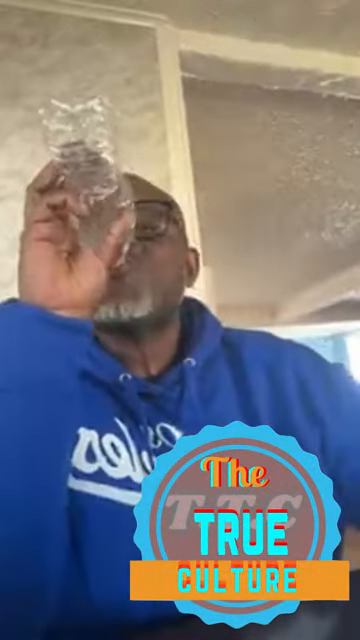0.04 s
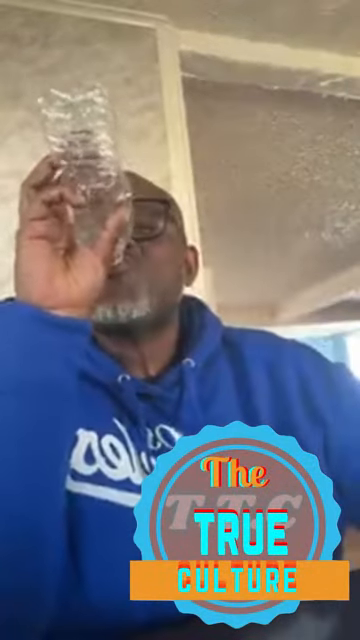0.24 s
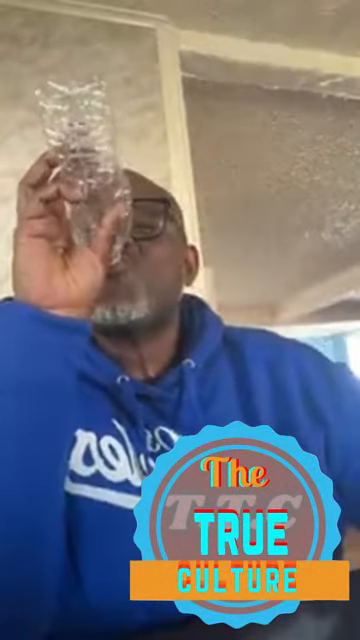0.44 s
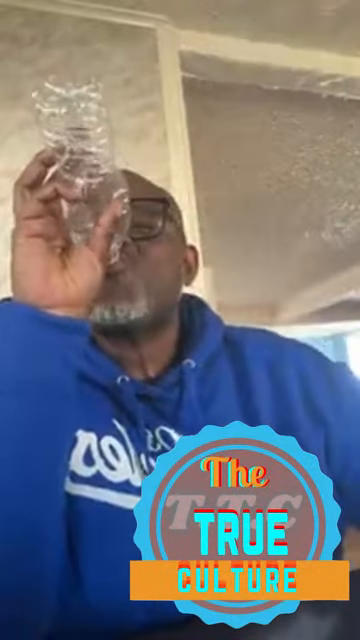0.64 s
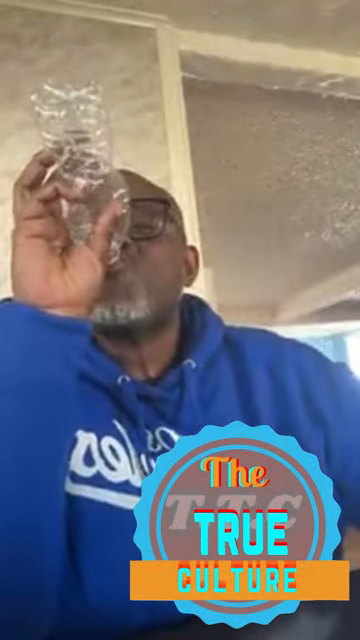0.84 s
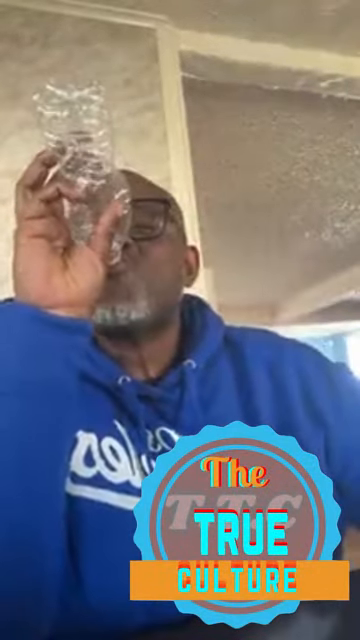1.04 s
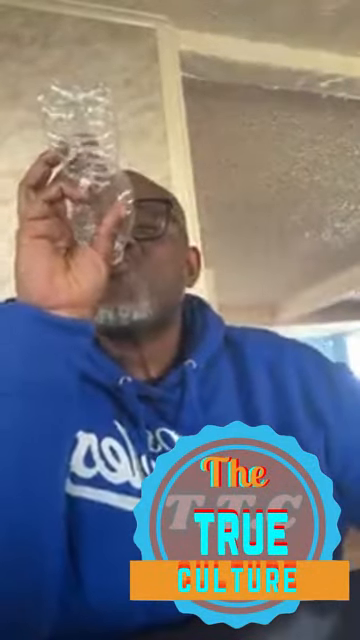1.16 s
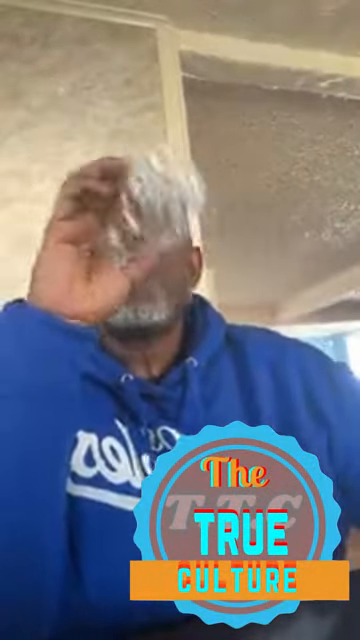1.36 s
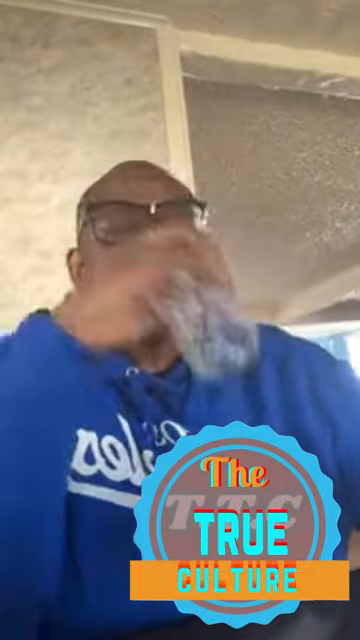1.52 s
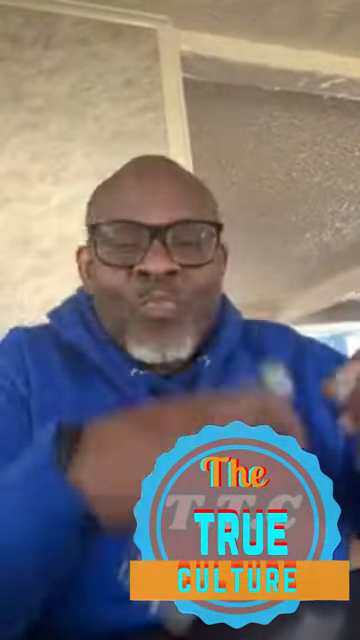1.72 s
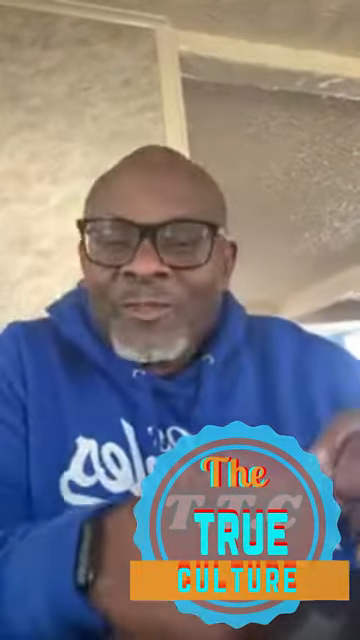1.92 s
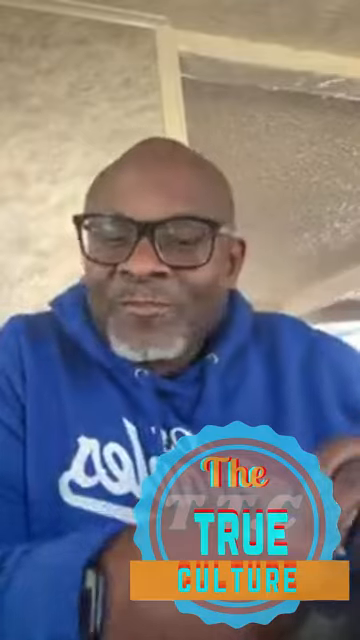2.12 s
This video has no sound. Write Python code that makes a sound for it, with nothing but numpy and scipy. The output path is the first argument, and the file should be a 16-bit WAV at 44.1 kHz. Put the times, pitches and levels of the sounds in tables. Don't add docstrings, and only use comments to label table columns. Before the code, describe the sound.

A thin plastic bottle crackles in the hand, sharp snaps with gaps in a small bare room

```python
import sys
import numpy as np
from scipy import signal
from scipy.fft import rfft, irfft, next_fast_len
from scipy.io import wavfile
from scipy.ndimage import uniform_filter1d

SR = 44100
rng = np.random.default_rng(int(sys.argv[2]) if len(sys.argv) > 2 else 0)


def bounce(signal):
    frames = np.transpose(np.atleast_2d(signal))
    limited = np.clip(frames, -1, 1)
    pcm = np.round(limited * 32767).astype(np.int16)
    wavfile.write(sys.argv[1], SR, pcm)


def decibels_to_gain(level_db):
    exponent = np.asarray(level_db, float) / 20
    return 10 ** exponent


N = 96314


def rms_one(x):
    return x / np.sqrt(np.mean(x ** 2) + 1e-20)


def at_hz(points, hz):
    known_hz, values = np.transpose(points)
    return np.interp(np.log(hz + 1), np.log(known_hz), values)


def coloured(x, spectrum):
    hz = np.arange(len(x) // 2 + 1) * SR / len(x)
    return rms_one(irfft(rfft(x) * decibels_to_gain(at_hz(spectrum, hz)), len(x)))


def drift(rate_hz):
    r = np.exp(-2 * np.pi * rate_hz / SR)
    wander = signal.lfilter([1], [1, -2 * r, r * r], rng.standard_normal(N + SR))
    return rms_one(wander[SR:])


def causal(gain_db):
    c = irfft(gain_db * np.log(10) / 20)
    c[1:len(c) // 2] *= 2
    c[len(c) // 2 + 1:] = 0
    return np.exp(rfft(c))


def add(out, s, sound):
    i = int(s * SR)
    out[..., i:i + sound.shape[-1]] += sound


def movement():
    # (time [s], rumble level [dB], rustle level [dB])
    arm_moves = [(0.0, -57, -60), (0.14, -64.5, -96), (0.31, -55, -55), (0.47, -63.5, -62), (0.7, -67, -96),
                 (0.85, -56, -65.5), (0.91, -59, -51), (1.05, -60.5, -76), (1.29, -62, -54),
                 (1.46, -58.5, -51), (1.63, -47, -50.5), (1.71, -51, -44), (1.98, -52.5, -46),
                 (2.18, -46.5, -63)]
    # (frequency [Hz], level per Hz [dB])
    rumble_spectrum = [(15, -45.5), (25, -1), (54, 10), (98, 2), (271, -7.5), (320, -6.5), (487, -19.5),
                       (900, -20.5), (1170, -60), (1980, -120)]
    # (frequency [Hz], level per Hz [dB])
    rustle_spectrum = [(300, -11.5), (700, -7), (2000, -7.5), (5000, -8), (10000, -7)]
    grains_per_s, rustle_db = 650, -4
    rumble_lump_db, rustle_lump_db = 1.5, 2.0
    t = np.arange(N) / SR
    s, rumble_level, rustle_level = np.transpose(arm_moves)

    rumble_db = np.interp(t, s, rumble_level) + rumble_lump_db * drift(3.5)
    rumble = coloured(rng.standard_normal(N), rumble_spectrum) * decibels_to_gain(rumble_db)

    catches = rng.random(N) < grains_per_s / SR
    strength = decibels_to_gain(3.5 * np.minimum(rng.exponential(1, N), 3))
    grains = catches * strength * rng.choice([-1, 1], N)
    cloth = coloured(grains + 0.76 * rng.standard_normal(N), rustle_spectrum)
    rustle = cloth * decibels_to_gain(np.interp(t, s, rustle_level) + rustle_db + rustle_lump_db * drift(25))
    return rumble + rustle


def microphone_hiss():
    # (frequency [Hz], level per Hz [dB])
    hiss_spectrum = [(410, -33), (700, -3), (836, -5), (8190, -13), (10000, -4.5), (13000, -53),
                     (22000, -120)]
    return decibels_to_gain(-69) * coloured(rng.standard_normal(N), hiss_spectrum)


def buckle(hz, below_db, above_db, length, fade_db):
    slips_per_s, rise_s, settle_s = 9000, 0.00081, 0.00082
    t, bins = np.arange(2048) / SR, np.arange(1025) * SR / 2048
    slips = rng.normal(0, 1, 2048) * (rng.random(2048) < slips_per_s / SR) + (t == 0)
    rise = np.clip(.25 + t / rise_s, 0, 1)
    fade = decibels_to_gain(-fade_db * t / length)
    settle = np.exp(-np.maximum(t - length, 0) / settle_s)
    run = rfft(slips * rise * settle * fade)

    run_db = 10 * np.log10(uniform_filter1d(np.abs(run) ** 2, size=45) + 1e-9)
    octaves = np.log2((bins + 20) / hz)
    panel_db = np.where(octaves < 0, max(below_db, 2) * octaves, -above_db * octaves)
    panel_db = np.maximum(panel_db, -60)
    direct = irfft(run * causal(panel_db - run_db))
    pulse = irfft(causal(panel_db))
    return np.array([direct, pulse]) / np.abs(direct).max()


def creaks():
    # (time [s], peak level [dB], pitch [Hz], fall away from it [dB per octave], length [s])
    crease_creaks = [(0.088, -36, 3000, 0, 0.01), (0.103, -41, 950, 7.5, 0.0073),
                     (0.173, -47, 517, 5, 0.009), (0.296, -40, 890, 13, 0.0097),
                     (0.55, -59, 480, 14.5, 0.011), (0.607, -54.5, 1600, 25, 0.011),
                     (0.63, -51, 615, 10, 0.045), (0.985, -49, 665, 9.5, 0.048),
                     (1.232, -54.5, 1200, 13, 0.008), (1.296, -37, 2000, 3.5, 0.023),
                     (1.364, -30.5, 3440, 2.5, 0.011), (1.736, -41, 6140, 0, .012),
                     (1.766, -32, 4960, 7, 0.0047), (2.066, -19.5, 2960, 4.5, 0.015),
                     (2.146, -42, 2315, 11, 0.0065)]
    out = np.zeros((2, N + SR))
    for s, db, hz, fall_db, length in crease_creaks:
        creak = buckle(hz, fall_db, fall_db, np.clip(length, .001, .035), fade_db=7)
        add(out, s, decibels_to_gain([[db], [db + 2.5]]) * creak)
    return out[:, :N]


def thuds():
    # (time [s], level [dB], pitch [Hz], time to fall 60 dB [s])
    low_thuds = [(0.098, -48.5, 337, 0.072), (0.167, -37.5, 55.8, 0.52), (0.19, -39.5, 303, 0.048),
                 (0.32, -41.5, 154.5, 0.17), (0.33, -42.5, 620, 0.31), (0.432, -48.5, 244, 0.065),
                 (0.639, -48, 167, 0.14), (0.722, -46, 121.4, 0.092), (0.825, -42.5, 145.7, 0.22),
                 (1.028, -47.5, 200, 0.095), (1.366, -42, 369, 0.044), (1.519, -25, 145.6, 0.11),
                 (1.521, -25.5, 75, 0.093), (1.589, -37, 153, 0.21), (1.821, -30, 331, 0.055),
                 (1.83, -35.5, 205, 0.12), (1.991, -44, 59, 0.16), (1.999, -46.5, 172.3, 0.22),
                 (2.075, -30, 395, 0.03), (2.13, -53, 352, 0.092), (1.826, -40.5, 1170, 0.27),
                 (1.91, -49, 1130, 0.17), (.338, -41, 720, 0.07), (.36, -52, 540, .2),
                 (1.03, -54, 640, .12), (1.049, -49.5, 190, .08), (1.545, -36, 125, 0.19),
                 (1.63, -41.5, 165, 0.11), (1.574, -43, 330, 0.083), (1.93, -46.5, 190, 0.12),
                 (0.736, -42, 70, 0.11), (1.691, -46.5, 217, .12), (1.775, -40, 192, 0.083)]
    rise_cycles, pitch_wobble, beat_depth, steady_hz = 0.36, 0.053, .7, 250
    out, t = np.zeros(N + SR), np.arange(SR // 2) / SR
    for s, db, hz, t60 in low_thuds:
        wobble = np.interp(t, np.arange(26) / 50, rng.normal(0, 1, 26))
        low = min(1, steady_hz / hz)
        turns = np.cumsum(hz * (1 + pitch_wobble * low * wobble)) / SR
        beat = 1 + beat_depth * (1 - low) * wobble[::-1]
        swell = 1 - np.exp(-t * hz / rise_cycles)
        add(out, s, beat * swell * decibels_to_gain(db - 60 * t / t60) * np.sin(2 * np.pi * turns))
    return out[:N]


def panel_snaps():
    # (time [s], peak level [dB], panel pitch [Hz], fall below it [dB per octave],
    # fall above it [dB per octave])
    snaps = [(0.191, -22.5, 1530, 3, 7), (0.3152, -13.5, 807, 13, 9), (0.7174, 8, 4840, 5.5, -3.5),
             (0.818, -10, 1365, 12, 6.5), (1.4734, -14, 2330, 9, 11.5), (1.4801, -22, 2420, 7.5, 7),
             (1.516, -6.5, 1570, 18, 9), (1.5781, -16.5, 1433, 15, 21.5), (1.8173, 6, 2550, 11.5, 2),
             (1.9598, -12, 5070, 50.5, 7.5), (1.9873, -10.5, 5100, 32, 2)]
    out = np.zeros((2, N + SR))
    for s, db, hz, below_db, above_db in snaps:
        snap = buckle(hz, below_db, above_db, length=0.003, fade_db=9.5)
        add(out, s, decibels_to_gain([[db], [db + 0.5]]) * snap)
    return out[:, :N]


def crease_ticks():
    # (time [s], peak level [dB], pitch [Hz], fall below it [dB per octave],
    # fall above it [dB per octave])
    ticks = [(0.31, -28, 2264, 11, 16), (0.3157, -17, 2250, 33, 24), (1.239, -51, 2930, 12, 20),
             (1.2518, -39, 1110, 5.5, 5), (1.269, -34.5, 4630, 3, 6.5), (1.344, -35, 5300, 3.5, 29),
             (1.655, -26, 5100, -2, -5.5), (1.671, -21, 4470, 11, 6), (1.682, -29.5, 2480, 1.5, 6.5),
             (1.71, -10, 4500, 1, -6), (1.773, -27.5, 1440, 8.5, 12), (1.783, -33, 2000, 2.5, 19),
             (1.802, -31, 1810, 17, 11.5)]
    out = np.zeros((2, N + SR))
    for s, db, hz, below_db, above_db in ticks:
        tick = buckle(hz, below_db, above_db, length=0.0042, fade_db=4.5)
        add(out, s, decibels_to_gain([[db], [db - 2]]) * tick)
    return out[:, :N]


def panel_modes():
    strike_times = [.3153, .3172, .7178, .7186, .724, .8184, .823, 1.078, 1.176, 1.344, 1.361, 1.4735,
                    1.5165, 1.518, 1.8176, 1.819, 1.9603, 2.1, 2.143]
    # (frequency [Hz], level [dB], time to fall 60 dB [s])
    modes_per_strike = [
        [(1200, -22.5, 0.0098), (2130, -14.5, .012), (2700, -17, 0.013), (3240, -25.5, .009),
         (3980, -26.5, 0.011)],
        [(690, -22, .02), (1200, -20.5, 0.026)],
        [(7160, -13.5, 0.007), (8200, -14, .009)],
        [(4230, -21, 0.0078), (4880, -15.5, 0.016), (5740, -20, .011)],
        [(2550, -33.5, .03)],
        [(870, -27, 0.025), (4650, -22.5, 0.012), (5240, -20.5, .011), (6720, -21.5, .009)],
        [(2425, -26.5, .03), (3900, -31, 0.032)],
        [(1394, -52, .015)],
        [(3000, -58.5, .02)],
        [(2000, -49, 0.021)],
        [(4670, -39, .03)],
        [(930, -21, 0.02), (1630, -26, 0.019), (2435, -21.5, 0.01), (3680, -21, 0.016), (5200, -32.5, .009)],
        [(2410, -32, 0.018), (2790, -22.5, .012), (4910, -16, 0.0078)],
        [(3620, -17.5, 0.022), (4520, -25, 0.014)],
        [(2360, -15, .018), (2830, -17, 0.023), (8260, -3, 0.012)],
        [(3145, -20, 0.018), (3630, -19, 0.022), (4030, -23.5, 0.015)],
        [(4720, -17, 0.018), (5050, -17, 0.024), (5500, -17.5, 0.015), (6580, -17, .012), (7770, -25, 0.015)],
        [(2268.5, -47, .03)],
        [(1070, -47, 0.036), (2450, -41, 0.028)],
    ]
    longest_s, rise_s, walls_db = .032, 0.00054, -6
    out, t = np.zeros((2, N + SR)), np.arange(4096) / SR
    for s, modes in zip(strike_times, modes_per_strike):
        for hz, db, t60 in modes:
            fade = decibels_to_gain([[db], [db + walls_db]] - 60 * t / min(t60, longest_s))
            add(out, s, fade * np.sin(2 * np.pi * hz * t) * np.clip(t / rise_s, 0, 1))
    return out[:, :N]


def stiff_spot_rings():
    # (time [s], frequency [Hz], level [dB], time to fall 60 dB [s])
    rings = [(0.3155, 730, -26.5, 0.031), (0.7176, 7630, -0.5, 0.0073), (0.7185, 3770, -13.5, 0.0077),
             (0.7178, 2585, -9.5, 0.0081), (0.819, 1415, -16.5, 0.04), (1.241, 2930, -47.5, 0.0098),
             (1.345, 5410, -27, 0.021), (1.345, 6110, -30, 0.041), (1.35, 3030, -38.5, 0.036),
             (1.362, 3047, -29, 0.035), (1.364, 3680, -32, 0.06), (1.5153, 1712, -7.5, 0.019),
             (1.5165, 855, -15, 0.018), (1.8171, 2544, -12.5, 0.012), (1.819, 4670, -6, 0.011),
             (1.8178, 1601, -10.5, 0.019), (1.773, 1470, -37, 0.015), (1.8, 1860, -36, 0.02),
             (1.9872, 5720, -7.5, 0.0035), (2.069, 3395, -33.5, 0.032)]
    roughness, longest_s, rise_s, walls_db = .6, .04, .001, -7.5
    out, t = np.zeros((2, N + SR)), np.arange(4096) / SR
    for s, hz, db, t60 in rings:
        uneven = 1 + roughness * np.interp(t, np.arange(100) / 900, rng.normal(0, 1, 100))
        fade = decibels_to_gain([[db], [db + walls_db]] - 60 * t / min(t60, longest_s))
        add(out, s, uneven * fade * np.sin(2 * np.pi * hz * t) * np.clip(t / rise_s, 0, 1))
    return out[:, :N]


def room(sent):
    # (frequency [Hz], time to fall 60 dB [s])
    room_t60 = [(150, 0.7), (500, 0.25), (1500, 0.38), (4000, 0.35), (7000, 0.37), (10000, 0.3)]
    # (frequency [Hz], level [dB])
    room_colour = [(150, 20), (500, 5), (1500, 0.5), (4000, -1.5), (9000, 2)]
    # (time [s], level [dB])
    to_walls = [(0, -0.5), (.315, -2.5), (.72, -1.5), (.82, -1), (1.49, -1.4), (1.65, -2.5), (1.82, -1),
                (1.96, -1), (1.99, -5.5), (2.18, -0.5)]
    room_db, gap_s, rise_s = -38.5, .002, 0.007
    early_db, early_t60_s = 6, 0.058
    t, tail = np.arange(SR // 2) / SR, 0
    band_edges = 80 * 2 ** np.arange(0, 7.6, .5)
    for low, high in zip(band_edges, band_edges[1:]):
        hz = np.sqrt(low * high)
        band_filter = signal.butter(2, [low, high], "band", fs=SR, output="sos")
        band = signal.sosfilt(band_filter, rng.standard_normal(len(t)))
        late = decibels_to_gain(-60 * t / at_hz(room_t60, hz))
        early = decibels_to_gain(early_db - 60 * t / early_t60_s)
        tail = tail + band * decibels_to_gain(at_hz(room_colour, hz)) * (late + early)
    tail = tail * np.clip((t - gap_s) / rise_s, 0, 1)
    walls_db = np.interp(np.arange(N) / SR, *np.transpose(to_walls))
    return decibels_to_gain(room_db) * signal.fftconvolve(sent * decibels_to_gain(walls_db), tail)[:N]


def scene():
    background = movement() + microphone_hiss()
    direct, sent = creaks() + panel_snaps() + crease_ticks() + panel_modes() + stiff_spot_rings()
    return (background + direct + thuds() + room(sent))[None]


def band_limit(x):
    return signal.sosfilt(signal.butter(12, 11050, fs=SR, output="sos"), x)


def record(dry):
    # (frequency [Hz], level [dB])
    mic_colour = [(60, -2), (300, 5.5), (2000, 1), (4500, 3.5), (6300, -5), (8200, -4.5), (10000, -7)]
    limit = .9
    step_hz, step_db = 8500, -6.5
    cut_hz, cut_db_per_khz = 9637, 43
    size = 2 * next_fast_len(N // 2 + 4096)
    hz = np.arange(size // 2 + 1) * SR / size
    picked_up = irfft(rfft(dry, size) * causal(at_hz(mic_colour, hz)), size)
    limited = limit * np.tanh(picked_up / limit)
    treble_step_db = step_db * np.clip((hz - step_hz) / 100 + .5, 0, 1)
    treble_cut_db = np.clip(cut_db_per_khz * (hz - cut_hz) / 1000, 0, 70)
    mix = irfft(rfft(limited) * decibels_to_gain(treble_step_db - treble_cut_db), size)[:, :N]
    return band_limit(mix)


dry = scene()
out = record(dry)
bounce(out)
```